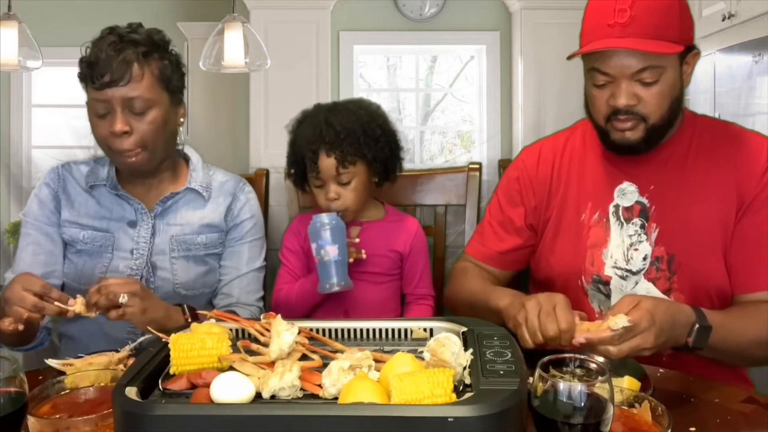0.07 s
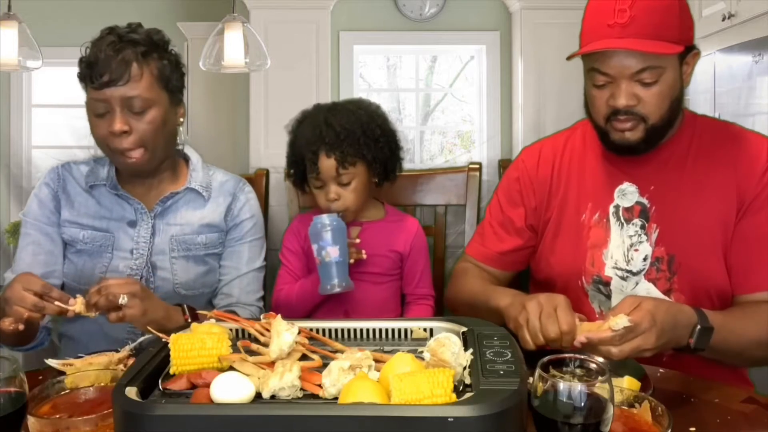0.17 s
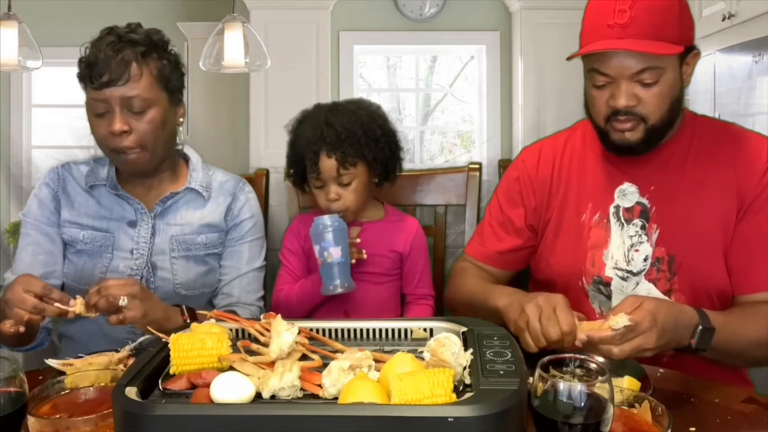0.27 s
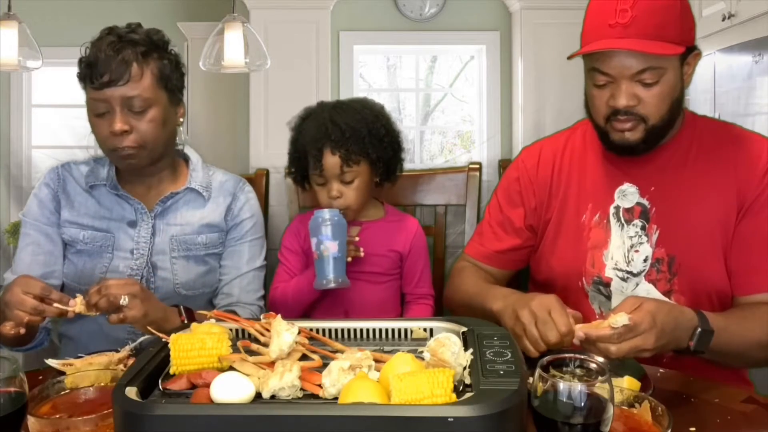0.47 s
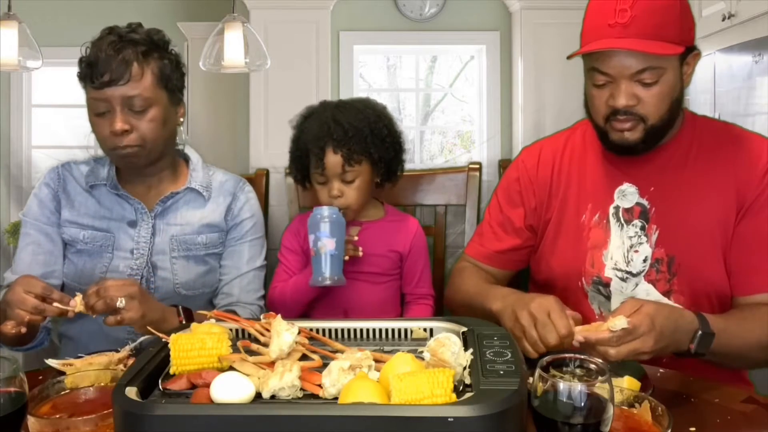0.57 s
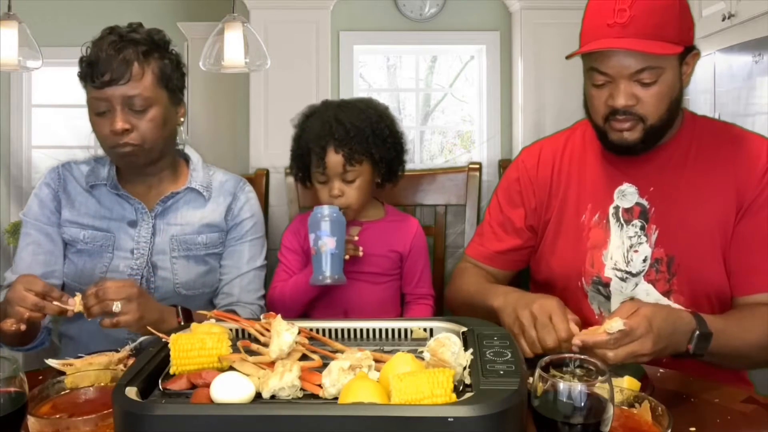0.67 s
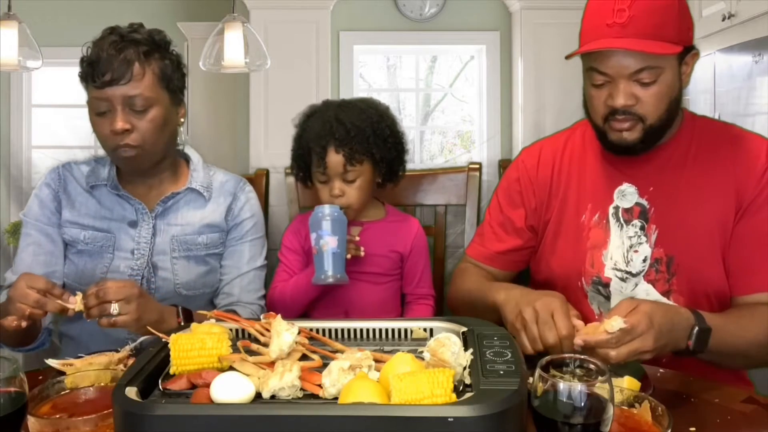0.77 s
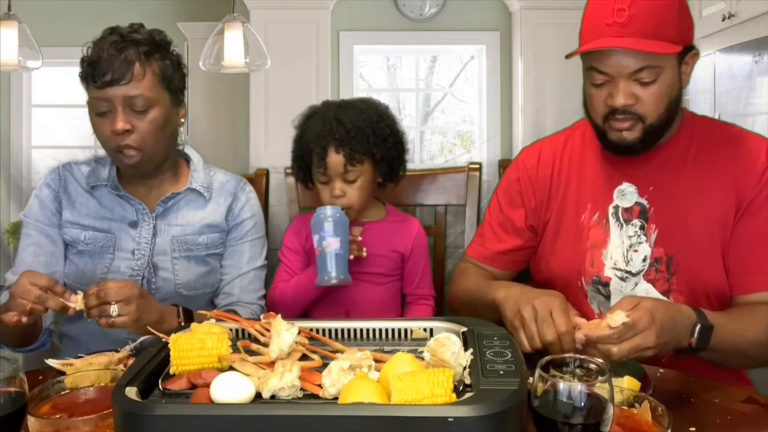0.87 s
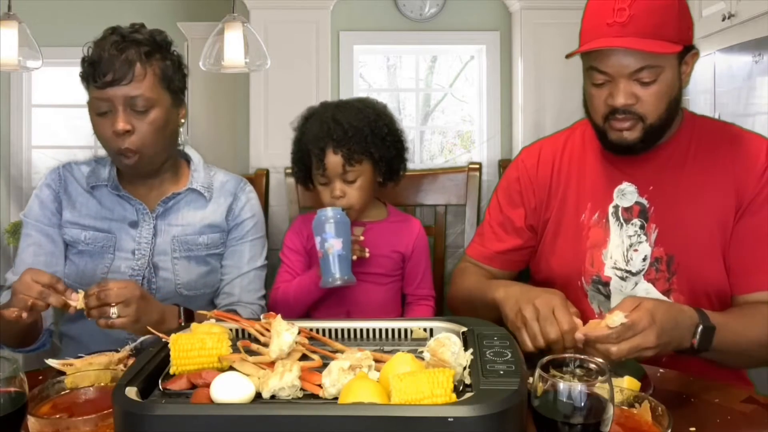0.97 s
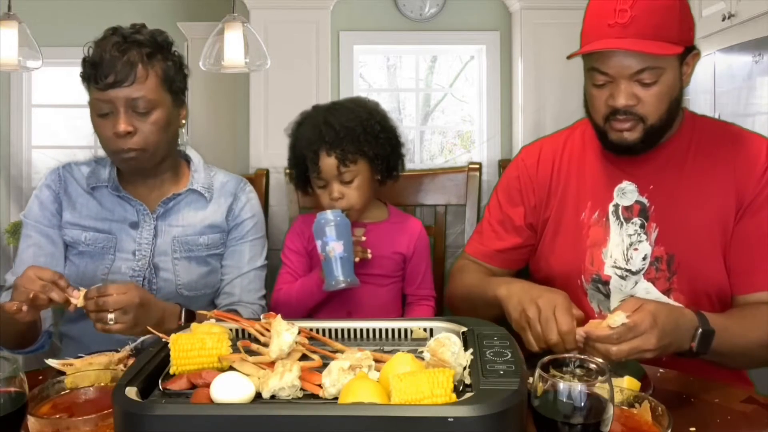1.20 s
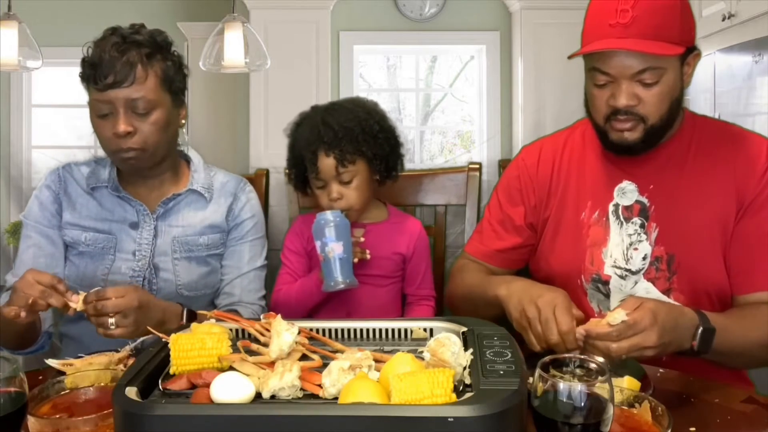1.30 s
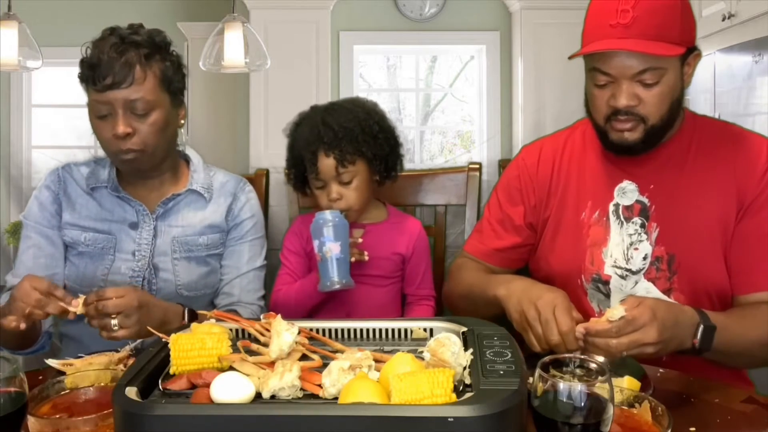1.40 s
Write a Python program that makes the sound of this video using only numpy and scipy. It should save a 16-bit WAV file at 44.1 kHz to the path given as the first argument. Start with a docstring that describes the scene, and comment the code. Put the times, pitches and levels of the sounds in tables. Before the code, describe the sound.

Crab leg shell cracks loudly, then a lighter snap and soft handling bumps.

```python
"""Cracking crab legs by hand

At a kitchen table a thick leg shell breaks with one loud crack: it rings, fibres tear, the leg thuds.
A thinner piece gives a lighter snap, and splinters tick. Wet little squeaks come just before the
loud crack and again near the end, with two hollow bumps and a clink of tableware.
The table and the kitchen walls answer each sound over a low room hum."""
import sys
import numpy as np
from scipy import signal
from scipy.fft import rfft, irfft, next_fast_len
from scipy.io import wavfile

SR = 44100
rng = np.random.default_rng(int(sys.argv[2]) if len(sys.argv) > 2 else 0)


def materialize(psi):
    """Save the field psi as 16-bit PCM at rate SR to the path in sys.argv[1].

    A 1-D psi becomes a single channel; in a 2-D psi each row is a channel.
    """
    bounded = np.clip(np.atleast_2d(psi).T, -1, 1)
    quanta = np.round(bounded * 32767).astype(np.int16)
    wavfile.write(sys.argv[1], SR, quanta)


N = 63945


def amp(db):
    """Decibels to gain."""
    return 10 ** (np.asarray(db) / 20)


def clock(length_s):
    """Sample times in seconds."""
    return np.arange(int(length_s * SR)) / SR


def decay(t, t60):
    """An envelope that falls 60 dB in t60 seconds."""
    return np.exp(-np.log(1000) * t / t60)


def unit(x):
    """Normalise to an energy of one."""
    return x / np.sqrt(np.sum(x ** 2) + 1e-20)


def delay(x, s):
    """Push a sound s seconds later, keeping its length."""
    return np.pad(x, (round(s * SR), 0))[:len(x)]


def curve_at(points, hz):
    """Read a (frequency, value) curve on a log frequency axis."""
    freqs, values = np.transpose(points)
    return np.interp(np.log(hz + 1), np.log(freqs + 1), values)


def click(eq):
    """A minimum-phase impulse shaped by an EQ curve."""
    size = 4096
    cepstrum = irfft(np.log(amp(curve_at(eq, np.fft.rfftfreq(size, 1 / SR)))))
    cepstrum[1:size // 2] *= 2
    cepstrum[size // 2 + 1:] = 0
    return unit(irfft(np.exp(rfft(cepstrum))))


def burst(eq, t60):
    """A fast-decaying puff of EQ-shaped noise."""
    t = clock(.5)
    noise = rng.standard_normal(len(t)) * decay(t, t60)
    return unit(signal.fftconvolve(noise, click(eq))[:len(t)])


def ring(modes, attack_s):
    """Decaying sine modes with a softened attack."""
    t = clock(.5)
    waves = sum(amp(db) * decay(t, t60) * np.sin(2 * np.pi * hz * t) for hz, t60, db in modes)
    return unit(waves * (1 - np.exp(-t / attack_s)))


# Breaks of the thick shell; the first has nearly died away when the scene opens (time [s], level [dB])
CRACK_CUES = [(-.09, -11), (.2184, -16), (.2195, -0.3176), (.257, -19)]
# Resonances of that shell (frequency [Hz], bandwidth [Hz], level [dB])
SHELL_MODES = [(822, 230.3, -13), (1381, 394, -6), (1778, 395, -3), (2605.6, 295, -1), (3075, 222, 2.5),
               (3387, 342, 0), (4209, 417, -8.5), (5335, 680, -9), (6007, 507, -7), (7493, 980, -14),
               (10040, 870, -18), (10640, 930, -21), (12777, 550, -15.5)]
# EQ of the fibres tearing behind a break (frequency [Hz], level [dB])
TEAR_EQ = [(100, -35.5), (450, -11.5), (1000, -11.5), (4000, 19.5), (6000, 10.5), (10000, 12), (15500, 0)]
# Low body of the leg giving way (frequency [Hz], T60 [s], level [dB])
THUD_MODES = [(347.46, 0.013, -17), (456.4, 0.01624, 1.5), (546.3, 0.039, -6.5)]

def cracks():
    """The leg's two walls break in quick turn and ring the damped shell; fibres tear, the leg thuds."""
    t = clock(.5)
    wall = sum((-1) ** k * amp(db) * width * np.exp(-np.pi * width * t) * np.cos(2 * np.pi * hz * t)
               for k, (hz, width, db) in enumerate(SHELL_MODES))
    shell = unit(wall + amp(-6.5) * delay(wall, s=.00093))
    thud = delay(ring(THUD_MODES, attack_s=.0005), s=.0017317)
    hits = []
    for s, db in CRACK_CUES:
        tear = burst(TEAR_EQ, t60=.018)
        hits.append((s, db, shell + amp(-11) * tear + amp(-9) * thud))
    return kitchen(hits, wet_db=-.5)


# Decay time of the kitchen reverb (frequency [Hz], T60 [s])
REVERB_T60 = [(200, .25), (550, .35), (1500, .46), (3300, .45), (6000, .44), (10000, .33), (15000, .33)]
# EQ of its tail (frequency [Hz], level [dB])
REVERB_EQ = [(200, -1), (500, 0), (1000, 0.5), (1500, 5), (2500, -4), (3200, 2.5), (4200, -1), (5500, 0.5),
             (7500, 0.5), (10000, 1.5), (12500, -1.5), (15000, 4.5)]

def kitchen(hits, wet_db):
    """Mix (time, level, sound) hits; table, dishes and near walls reflect them, then a tail rings on."""
    preroll_s = .2  # room for a hit before time zero
    preroll = round(preroll_s * SR)
    direct = np.zeros(preroll + N)
    for s, db, sound in hits:
        slot = direct[round((s + preroll_s) * SR):][:len(sound)]
        slot += amp(db) * sound[:len(slot)]
    t = clock(1)
    hz, frame_s, noise = signal.stft(rng.standard_normal(len(t)), SR, nperseg=256)
    fade = decay(frame_s, curve_at(REVERB_T60, hz)[:, None])
    tone = amp(curve_at(REVERB_EQ, hz))[:, None]
    tail = signal.istft(noise * fade * tone, SR)[1][:len(t)]
    tail = unit(tail * (1 - np.exp(-t / .004)))  # soft onset
    early = unit(rng.standard_normal(len(t)) * decay(t, t60=.07) * (t > .0047))  # 4.7 ms pre-delay
    reverb = amp(-4.5) * tail + amp(-5.5) * early
    wet = signal.fftconvolve(direct, reverb)[:len(direct)]
    return (direct + amp(wet_db) * wet)[preroll:]


# EQ of the room tone (frequency [Hz], level [dB])
HUM_EQ = [(12, -54), (20, -3.5), (58, -5), (88, -3), (134, -4), (255, -9.5), (285, -7), (319, -4),
          (347, -13.5), (410, -9.5), (527, -14), (574, -17), (825, -26), (1220, -25.5), (1610, -27),
          (2140, -33.5), (2320, -32), (4060, -33), (10200, -53), (14700, -60), (16000, -69.5)]

def room_hum(rms_db):
    """A steady bed of bass-heavy room noise."""
    tone = amp(curve_at(HUM_EQ, np.fft.rfftfreq(2 * N, 1 / SR)))
    noise = irfft(rfft(rng.standard_normal(2 * N)) * tone)[:N]
    return amp(rms_db) * noise / noise.std()


# Wet little squeaks (time [s], level [dB], start pitch [Hz], glide [octaves], length [s])
SQUEAK_CUES = [(.1955, -34, 1651, 0.144, 0.0083), (.1955, -40, 3617, 0.061, 0.0061642),
               (1.22, -42.5, 1543, 0.046, 0.009), (1.315, -33.5, 1504, -0.157, 0.0195),
               (1.362, -32, 2160, -0.74, 0.02662), (1.39, -37.5, 1586, 0.018, .008)]

def squeaks():
    """Brief gliding tones, roughened by phase jitter."""
    hits = []
    for s, db, hz, glide, length_s in SQUEAK_CUES:
        progress = clock(length_s) / length_s
        pitch = hz * 2 ** (glide * progress)
        jitter = .07 * rng.standard_normal(len(progress))
        phase = np.cumsum(2 * np.pi * pitch / SR + jitter)
        swell = np.sin(np.pi * progress)
        hits.append((s, db, unit(swell * np.sin(phase))))
    return kitchen(hits, wet_db=-9)


# Ticks of splintering shell, and the room's brief mid-pitched answer to the snap
# (time [s], level [dB], centre [Hz], width [octaves])
TICK_CUES = [(.316, -36, 12130, 0.55), (.6055, -40, 8747, 0.292), (.6255, -44.5, 5490, 0.43),
             (.6255, -48, 13300, .15), (.648, -35, 1770, 0.56), (.884, -56.5, 13130, 0.14),
             (1.165, -53, 14600, 0.1685), (1.183, -71.5, 15000, .1), (1.4118, -47.5, 9000, 0.26)]

def ticks():
    """Tiny bursts of narrow-band noise: high for splinters, mid-pitched for the room's answer."""
    skirt_db = -30.5
    hits = []
    for s, db, hz, octaves in TICK_CUES:
        edge, skirt = 2 ** (octaves / 2), 4 ** octaves
        band = [(hz / skirt, skirt_db), (hz / edge, 0), (hz * edge, 0), (hz * skirt, skirt_db)]
        hits.append((s, db, burst(band, t60=.016)))
    return kitchen(hits, wet_db=-5)


# Snaps of a thin piece of shell (time [s], level [dB])
SNAP_CUES = [(.6414, -22), (.6482, -42.5)]
# EQ of that thin shell (frequency [Hz], level [dB])
SNAP_EQ = [(300, -33), (1000, -31.5), (1500, -19.5), (2500, -13.5), (3400, -2.5), (4600, -1), (5700, -9.5),
           (7300, -7), (9000, -20.5), (15000, -33.5)]

def snaps():
    """Thin shell breaks: a bright transient with a short crunch behind it."""
    transient = click(SNAP_EQ)
    hits = []
    for s, db in SNAP_CUES:
        crunch = burst(SNAP_EQ, t60=.035)[:len(transient)]
        hits.append((s, db, transient + amp(-5) * crunch))
    return kitchen(hits, wet_db=-1)


# Soft hollow bumps (time [s], level [dB])
BUMP_CUES = [(1.2765, -16), (1.3165, -18)]
# Their hollow body (frequency [Hz], T60 [s], level [dB])
BUMP_MODES = [(425, .11, 0), (490, .05, -9)]

def bumps():
    """A padded contact wakes only low modes."""
    body = ring(BUMP_MODES, attack_s=.008)
    return kitchen([(s, db, body) for s, db in BUMP_CUES], wet_db=-9)


# A light touch on tableware (time [s], level [dB])
CLINK_CUES = [(1.4172, -22.5)]
# Ring of the dish (frequency [Hz], T60 [s], level [dB])
DISH_MODES = [(1100, .03, -11), (1470, .04, -10), (1870, .04, -9), (2330, .03, -10), (3252, .15, -1),
              (3973, .085, 1), (6105, .06, -20), (7150, .03, -15)]
# EQ of the contact scrape (frequency [Hz], level [dB])
SCRAPE_EQ = [(200, -20), (1000, -4), (3000, 1), (5000, -5), (9500, -14.5), (11500, -24.5), (15500, -25.5)]

def clink():
    """A dish rings over the short scrape of the contact."""
    dish = ring(DISH_MODES, attack_s=.0018)
    hits = [(s, db, dish + amp(-3) * burst(SCRAPE_EQ, t60=.07)) for s, db in CLINK_CUES]
    return kitchen(hits, wet_db=-6)


def scene():
    """The mono mix: breaking shell and handling sounds over the room tone."""
    breaking = cracks() + snaps() + ticks()
    handling = squeaks() + bumps() + clink()
    return (breaking + handling + room_hum(rms_db=-54.5))[None]


def record(dry):
    """The microphone rolls off the sub-bass and keeps nothing above its band limit."""
    low_cut_hz, top_hz = 30, 15900
    size = next_fast_len(2 * N)
    hz = np.fft.rfftfreq(size, 1 / SR)
    low_cut = 1 - 1 / (1 + (hz / low_cut_hz) ** 6)
    high_cut = np.clip((top_hz - hz) / 300 + .5, 0, 1)
    return irfft(rfft(dry, size) * low_cut * high_cut, size)[:, :N]


dry = scene()
out = record(dry)
materialize(out)
```